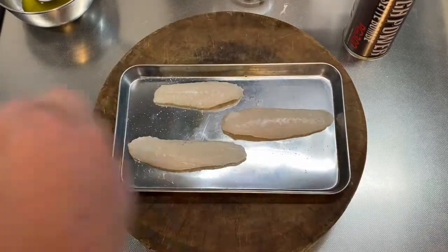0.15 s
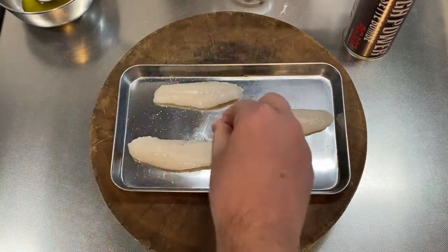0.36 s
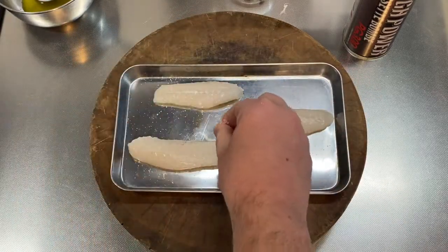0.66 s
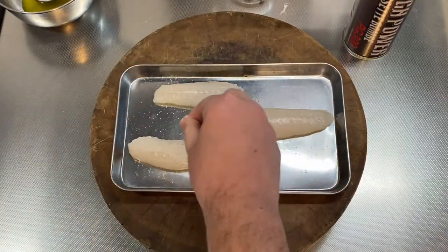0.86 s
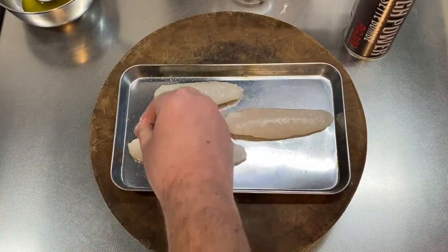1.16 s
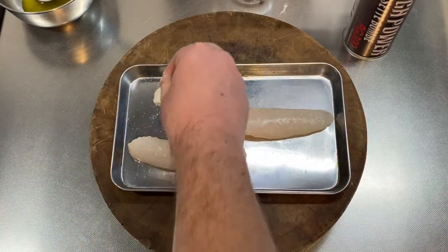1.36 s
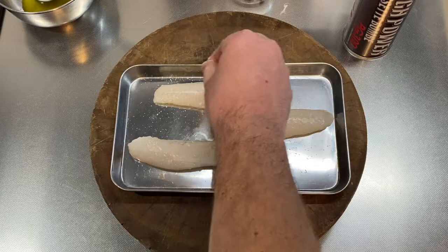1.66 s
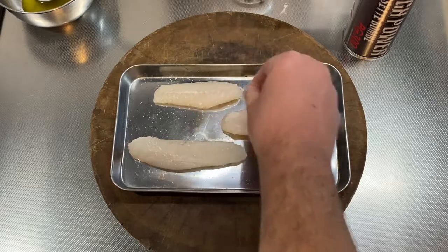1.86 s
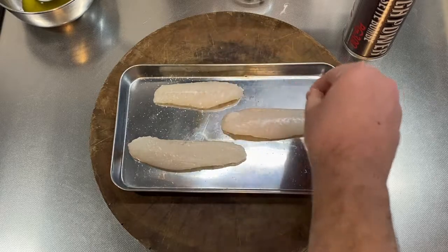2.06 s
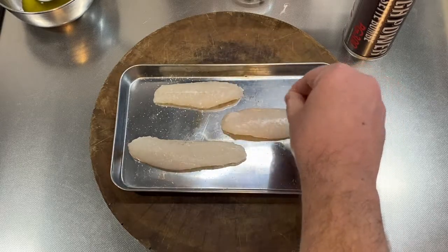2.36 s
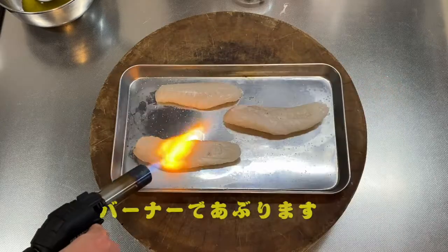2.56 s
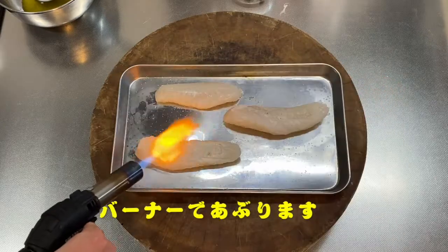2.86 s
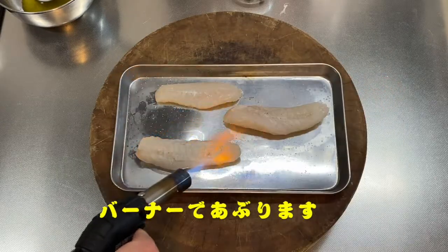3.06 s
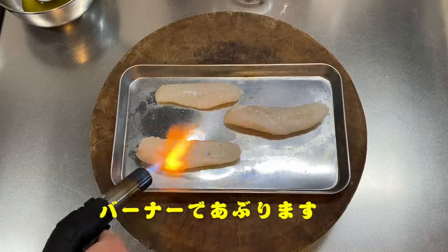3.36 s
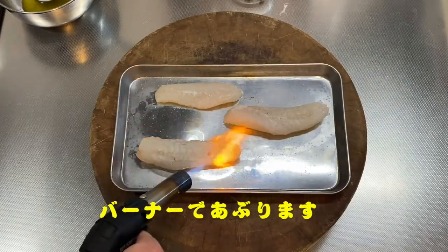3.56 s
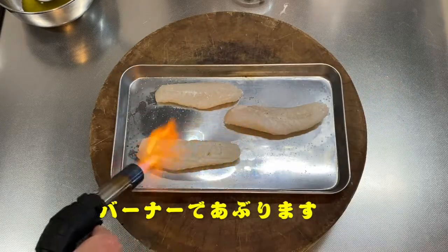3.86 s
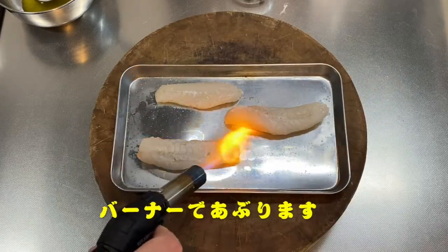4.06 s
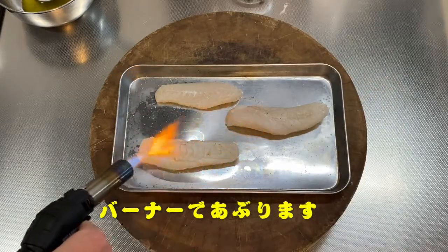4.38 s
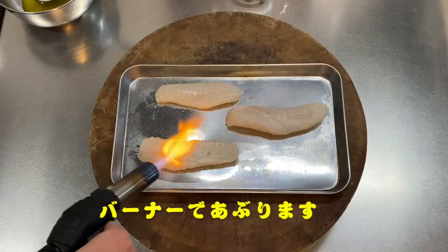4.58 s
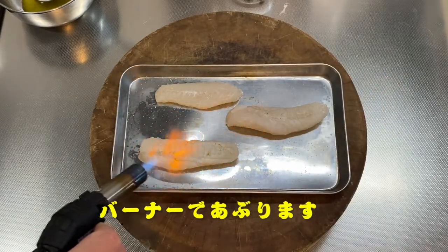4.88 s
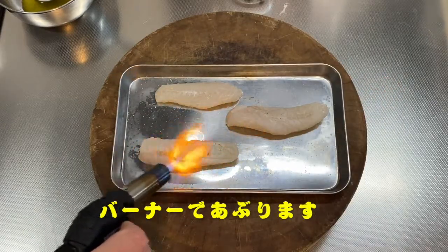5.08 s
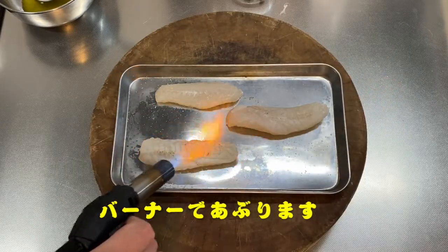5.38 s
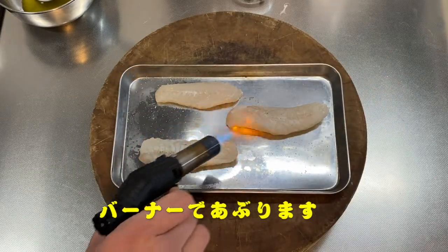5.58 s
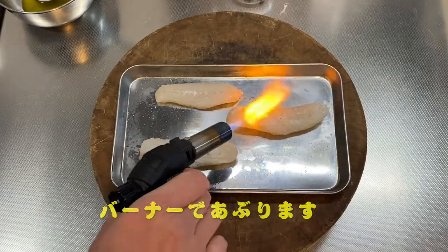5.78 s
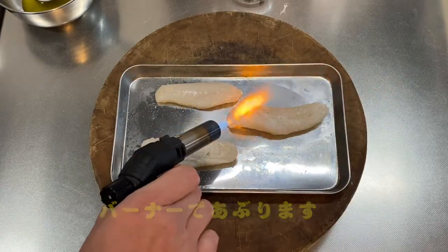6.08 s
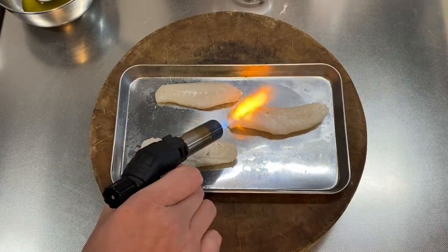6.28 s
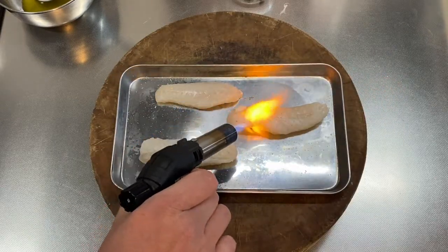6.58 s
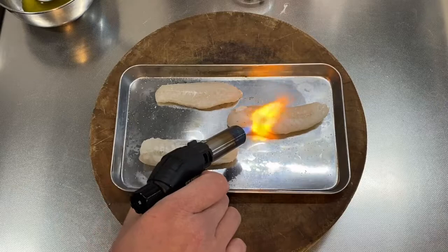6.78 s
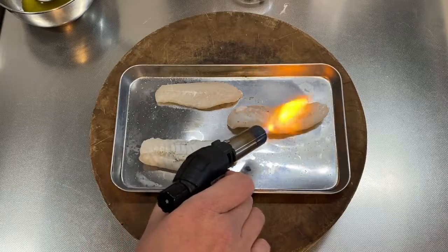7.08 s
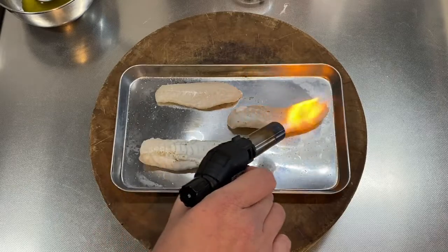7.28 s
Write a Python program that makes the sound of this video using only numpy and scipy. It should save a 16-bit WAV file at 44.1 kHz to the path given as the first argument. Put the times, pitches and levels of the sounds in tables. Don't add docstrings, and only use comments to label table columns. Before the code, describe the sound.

Very quiet finger-rubs of salt over a faint kitchen hum, then a sudden cut to a loud, steady gas torch roar with crackling pops.

```python
import sys
import numpy as np
from scipy import signal
from scipy.fft import rfft, irfft, next_fast_len
from scipy.io import wavfile
from scipy.ndimage import uniform_filter1d

SR = 44100
rng = np.random.default_rng(int(sys.argv[2]) if len(sys.argv) > 2 else 0)


def inscribe(sig):
    pcm = np.round(np.clip(np.atleast_2d(sig).T, -1, 1) * 32767)
    wavfile.write(sys.argv[1], SR, pcm.astype(np.int16))


def nominal_scale(level):
    x = np.asarray(level, float) / 20
    return 10 ** x


N = 327663
SIZE = next_fast_len(N + SR // 2)
HZ = np.fft.rfftfreq(SIZE, 1 / SR)
T = np.arange(N) / SR
CUT_S, CUT_RISE_S = 2.458, 0.01


def shape_db(points):
    hz, db = np.transpose(points)
    return np.interp(np.log(HZ + 1), np.log(hz), db)


def modes_db(modes):
    return sum(db / (1 + (2 * (HZ - hz) / width) ** 2) for hz, width, db in modes)


def zone_db(lo_hz, hi_hz):
    above_lo = 1 / (1 + (lo_hz / (HZ + 1)) ** 20)
    above_hi = 1 / (1 + (hi_hz / (HZ + 1)) ** 20)
    return 20 * np.log10(above_lo - above_hi + 1e-9)


def filtered(x, gain):
    return irfft(rfft(x, SIZE) * gain, SIZE)[..., :N]


def noise(db, x=None):
    if x is None:
        x = rng.standard_normal(N)
    y = filtered(x, nominal_scale(db))
    return y / np.std(y)


def walk(rate):
    k = int(SR / rate)
    held = np.repeat(rng.standard_normal(N // k + 1), k)
    slewed = uniform_filter1d(uniform_filter1d(held, k), k)
    return 0.87 * slewed[:N]


def zones(db, edges_hz, levels_db, flicker_db, rate):
    whole = rng.standard_normal(N)
    out = np.zeros(N)
    for lo, hi, level in zip(edges_hz, edges_hz[1:], levels_db):
        part = noise(db + zone_db(lo, hi), whole)
        out += part * nominal_scale(level + flicker_db * walk(rate))
    return out


def strokes(rows, rise_db_s, fall_db_s):
    gains = []
    for s, hold, db, *_ in rows:
        rise = rise_db_s * np.clip(s - T, 0, None)
        fall = fall_db_s * np.clip(T - s - hold, 0, None)
        gains.append(nominal_scale(db - rise - fall))
    return np.array(gains)


def clicks(rows, decay_s, fizz_db, fizz_s):
    t = np.arange(2048) / SR
    out = np.zeros(N + len(t))
    fade = np.exp(-t / decay_s) + nominal_scale(fizz_db) * np.exp(-t / fizz_s)
    grains = rng.standard_normal((len(rows), len(t)))
    for (s, db, dull), grain in zip(rows, grains):
        burst = signal.lfilter([1, -.6, -.4], [1, -np.clip(dull, 0, .95)], grain * fade)
        start = int(s * SR)
        out[start:start + len(t)] += nominal_scale(db) * burst / np.abs(burst).max()
    return out[:N]


def gusts():
    return nominal_scale(1.5 * walk(25))


def moving_arm():
    # full level from s, hold in s, air rumble in dB, sleeve rustle in dB above it.
    moves = [(0, .05, -66, -1.5), (.24, .04, -71.5, -21), (.48, .1, -65.5, -2), (.66, 0.079, -76, 2.5),
             (.84, .04, -79.5, 5), (.96, 0.064, -64, -10), (1.62, .08, -71, -4.5), (1.88, 0.084, -69, -14),
             (2.22, .04, -69, -21), (2.393, .08, -71, 3)]
    # frequency in Hz, level in dB per Hz.
    rumble_spectrum = [(15, -16), (35, -5), (60, 10.5), (85, 10.5), (130, 6), (200, -29)]
    rustle_spectrum = [(100, -16), (160, 2.5), (250, 5), (400, -6), (800, -14.5), (1300, -25), (2200, -58)]
    cloth_spectrum = [(800, -20), (1800, -4), (2600, 0), (3600, -10), (6000, -25)]
    # start in s, hold in s, level in dB.
    brush_stroke = (0, .035, -80)
    gains = strokes(moves, rise_db_s=90, fall_db_s=110)
    rumble = gains.sum(0) * gusts() * noise(shape_db(rumble_spectrum))
    rustle_gain = nominal_scale([row[3] for row in moves]) @ gains
    rustle = rustle_gain * gusts() * noise(shape_db(rustle_spectrum))
    brush = strokes([brush_stroke], 0, fall_db_s=300)[0] * noise(shape_db(cloth_spectrum))
    return rumble + rustle + brush


def fan():
    # frequency in Hz, level in dB rms.
    hum_tones = [(119.6, -81), (237, -92.5)]
    out = np.zeros(N)
    for hz, db in hum_tones:
        level = np.sqrt(2) * nominal_scale(db + 3.5 * walk(13))
        out += level * np.sin(2 * np.pi * hz * T + 1.7 * walk(4.4))
    return out


def ventilation():
    # frequency in Hz, level in dB per Hz.
    room_spectrum = [(15, -3), (35, -13), (60, 9), (100, -4), (119.6, 3), (140, -1), (240, -3.5),
                     (400, -21), (900, -33)]
    return nominal_scale(-75) * noise(shape_db(room_spectrum))


def fingers():
    # full level from s, hold in s, level in dB, lower rasp in dB above it.
    rubs = [(.505, .03, -71, -9), (.604, 0.017, -79, 4), (.645, 0.048, -83, -6), (.8, 0.03, -72, -10),
            (0.923, 0.029, -73.5, -8), (1.028, .028, -77, -17), (1.14, .025, -74, -12),
            (1.27, .02, -77, -20), (1.374, .012, -80, -2), (1.464, 0.042, -70.5, -10),
            (1.612, 0.023, -74, -6), (1.718, 0.018, -74.5, -6), (1.822, 0.041, -72, -9),
            (1.942, 0.051, -72.5, -9), (2.069, .075, -72, -13), (2.241, 0.038, -69.5, -11),
            (2.391, 0.1, -67, -7.5)]
    # frequency in Hz, level in dB per Hz.
    rub_spectrum = [(5500, -39), (7000, -9), (8500, 1.5), (10500, -3), (13000, 1), (16000, 9)]
    rasp_spectrum = [(1200, -22), (2500, -17), (4000, -15.5), (5500, -1), (7000, 0), (9000, -25)]
    # start in s, peak in dB, dullness 0-1.
    first_slips = [(0.0294, -76, 0.3), (0.4509, -52, 0.6), (0.5945, -64, 0.3), (1.3758, -59, 0.5),
                   (1.4511, -60, 0.4), (2.2313, -59, 0.3), (2.3755, -60, 0.3)]
    gains = strokes(rubs, rise_db_s=600, fall_db_s=402)
    hiss = zones(shape_db(rub_spectrum), [1, 8800, 9900, 11200, 12500, 1e6],
                 [-3, -9.5, -4.5, -7.5, 0.0], flicker_db=3.0, rate=30)
    rasp = zones(shape_db(rasp_spectrum), [1, 3400, 4800, 1e6],
                 [-9, -9.5, -1.5], flicker_db=1.5, rate=25)
    rasp_gain = nominal_scale([row[3] for row in rubs]) @ gains
    slips = nominal_scale(2.8 * walk(500))
    ticks = nominal_scale(-3.0) * clicks(first_slips, .0015, fizz_db=-18, fizz_s=.008)
    return (gains.sum(0) * hiss + rasp_gain * rasp) * slips + ticks


def walls():
    # frequency in Hz, echo share in dB.
    echo_share = [(150, -32), (400, -20.5), (700, -2.5), (1000, -9.5), (1500, -12.5), (2500, -4),
                  (4500, -5.5), (9000, -14), (16000, 1.5)]
    t60_s, gap_s = 0.13, 0.0024
    t = np.arange(int(.3 * SR)) / SR
    decay = np.exp(-np.log(1000) * t / t60_s) * (t > gap_s)
    tails = rng.standard_normal((2, len(t))) * decay
    tails = tails / np.sqrt(np.sum(tails ** 2, axis=1, keepdims=True))
    return 1 + rfft(tails, SIZE) * nominal_scale(shape_db(echo_share))


def flame_reach():
    # time in s, share of the way 0-1.
    reach_path = [
        (2.4, 0.1),
        (5.3, 0),
        (5.55, 0.27),
        (5.9, 0.83),
        (7.43, 0.23),
    ]
    return np.interp(T, *np.transpose(reach_path))


def torch():
    # frequency in Hz, level in dB per Hz.
    roar_spectrum = [(25, -47), (50, -13), (100, -7), (220, -0.5), (500, 3), (1000, -6), (1300, -9.5),
                     (1650, -12), (2000, -9.5), (2900, -20), (3500, 2)]
    hiss_spectrum = [(2000, -27), (2900, 4.5), (4200, 0.5), (5600, -5), (7500, -9.5), (9000, -16),
                     (10500, -22.5), (13000, -23), (16000, -29.5)]
    # frequency in Hz, width in Hz, height in dB.
    tube_modes = [(1475, 38, 7.5), (3320, 1650, 8), (5210, 750, 8.5), (6310, 660, 11), (9800, 210, 7.5),
                  (2634, 17, 6.5)]
    counter_modes = [(92, 34, 4.5), (127, 26.6, -10), (152.6, 17, 5), (177, 14, -4), (256.6, 5.6, -11),
                     (226, 28.5, 8.5), (300.3, 26.5, -11), (340, 98, 6), (443, 19, -6), (516, 55, 4),
                     (571, 38, -9.5), (597.3, 46, 9), (770, 145, -7), (840, 75, 2), (1006, 190, 0.8),
                     (1178, 260, -6), (1370, 76, 0.5), (2122, 70, -10), (2677, 51, 0.5)]
    reach = flame_reach()
    place = modes_db(tube_modes) + modes_db(counter_modes)
    roar_levels_db = [-30 - .5 * reach, -35, -43.5 - 2 * reach]
    hiss_levels_db = [-42, -45.5 + 1 * reach]
    roar = zones(shape_db(roar_spectrum) + place, [1, 750, 1700, 2900],
                 roar_levels_db, flicker_db=1.0, rate=25)
    hiss = zones(shape_db(hiss_spectrum) + place, [2900, 7000, 1e6],
                 hiss_levels_db, flicker_db=1.36, rate=14)
    return (roar + hiss) * nominal_scale(0.54 * walk(60))


def tray(x):
    # frequency in Hz, width in Hz, height in dB.
    far_modes = [(817, 50, -9.5), (1006, 350, 6.5), (1623, 180, 15.5), (1780, 540, -13.5), (2880, 420, -2),
                 (3380, 180, 5), (4550, 220, 11), (9880, 250, 3.5)]
    bounce_s, sway_s, bounce_db = 0.00126, 0.00035, -16.5
    far = filtered(x, nominal_scale(modes_db(far_modes)))
    x = x + flame_reach() * (far - x)
    delay_s = bounce_s + sway_s * walk(2.5)
    return x + nominal_scale(bounce_db) * np.interp(T - delay_s, T, x)


def salt():
    # start in s, peak in dB.
    grain_bursts = [(2.5974, -36), (2.6903, -31), (2.7483, -24), (2.795, -26), (2.9302, -34), (3.1961, -28),
                    (3.411, -34), (3.4526, -29), (3.479, -25), (3.9734, -28), (4.2664, -28), (4.4274, -35),
                    (4.5584, -33), (4.562, -31), (4.677, -21.5), (4.7142, -27), (4.7711, -24),
                    (5.4649, -20), (5.4693, -27), (5.5029, -34), (5.5114, -26), (6.129, -28), (6.16, -30),
                    (6.2674, -37), (6.379, -29), (6.5041, -26.5), (6.564, -28), (6.6662, -34),
                    (6.7874, -40), (7.1754, -39)]
    spit_per_s, spit_db, spit_spread_db = 130, -46, 2.5
    dull, dull_per_db, big_db = 0.49, .05, -28
    spit = []
    for when, size in rng.random((int(spit_per_s * 5), 2)):
        s = CUT_S + when * (N / SR - CUT_S)
        spit.append((s, spit_db - spit_spread_db * np.log(size), .3))
    pops = [(s, db, dull + dull_per_db * max(db - big_db, 0)) for s, db in grain_bursts]
    loud = clicks(pops, 0.001, fizz_db=-10, fizz_s=0.012)
    return loud + clicks(spit, .0004, fizz_db=-26, fizz_s=.006)


def scene():
    room = walls()
    after = np.clip((T - CUT_S) / CUT_RISE_S, 0, 1) ** 2
    searing = (tray(torch()) + salt()) * (T > CUT_S - .1)
    salting = fingers() * (T < CUT_S)
    kitchen = moving_arm() + fan() + ventilation()
    return after * filtered(searing, room) + (1 - after) * (filtered(salting, room) + kitchen)


def band_limit(x):
    return signal.sosfilt(signal.butter(12, 17070, fs=SR, output="sos"), x)


def record(dry):
    # frequency in Hz, level in dB per Hz.
    self_spectrum = [(100, -2), (500, -5.5), (1200, -14.5), (2500, -20), (5000, -28), (9000, -27),
                     (16000, -24)]
    # frequency in Hz, share 0-1.
    apart_share = [(150, .03), (350, 0.63), (600, 1), (1400, 1), (2100, 0.5), (3300, 0.5), (4000, 0.64)]
    # frequency in Hz, phase by which the left port leads in radians.
    port_phase = [(0, -.05), (250, -.05), (550, -.3), (1500, -.2), (2050, .08), (2500, .25), (3400, .05),
                  (4300, .75), (5000, .24), (5700, 1.0), (6500, 2.3), (7480, 3.14), (10600, 6.28),
                  (13550, 9.42), (15000, 11.2), (16000, 11.9)]
    # frequency in Hz, share of the middle.
    lean_share = [(380, 0), (650, -.18), (860, .08), (1050, -.15), (1300, .05), (1700, -.05), (2100, 0)]
    dwell, top_hz = 0.022, 15780
    self_noise = [nominal_scale(-77) * noise(shape_db(self_spectrum)) for _ in range(2)]
    left, right = rfft(dry + self_noise, SIZE)
    turn = np.interp(HZ, *np.transpose(port_phase)) / 2
    turn = turn - dwell * np.sin(4 * turn) / 4
    apart = np.clip(shape_db(apart_share), 0, 1) * (left - right) / 2
    mid = np.cos(turn) * (left - apart)
    side = 1j * np.sin(turn) * right + apart + shape_db(lean_share) * mid
    lowpass = 1 / (1 + (HZ / top_hz) ** 600)
    mix = irfft(lowpass * np.array([mid + side, mid - side]), SIZE)[:, :N]
    return band_limit(mix)


dry = scene()
out = record(dry)
inscribe(out)
```